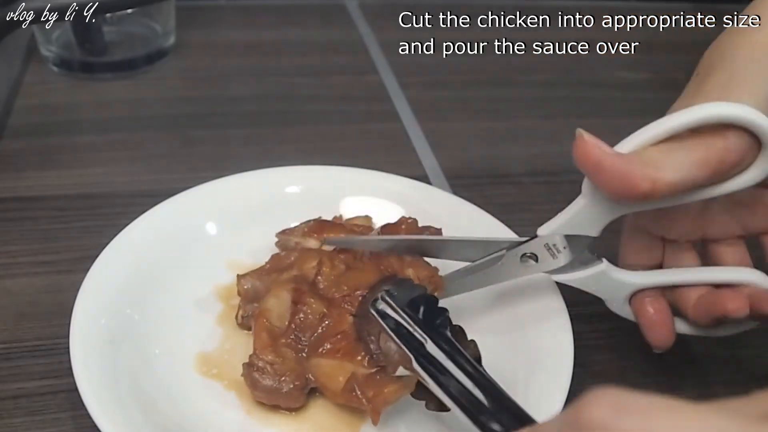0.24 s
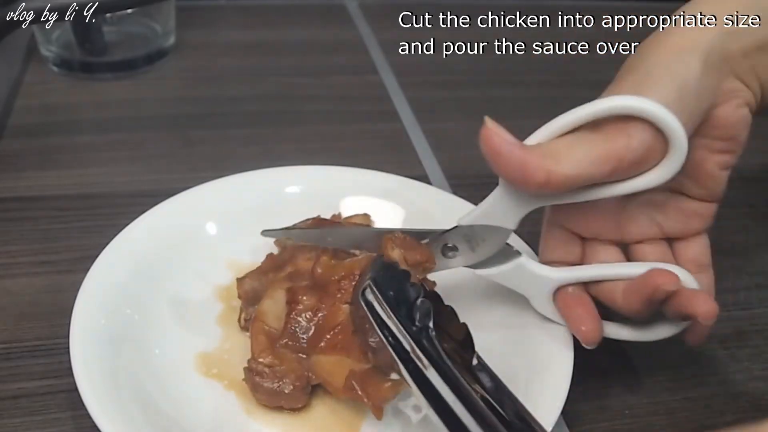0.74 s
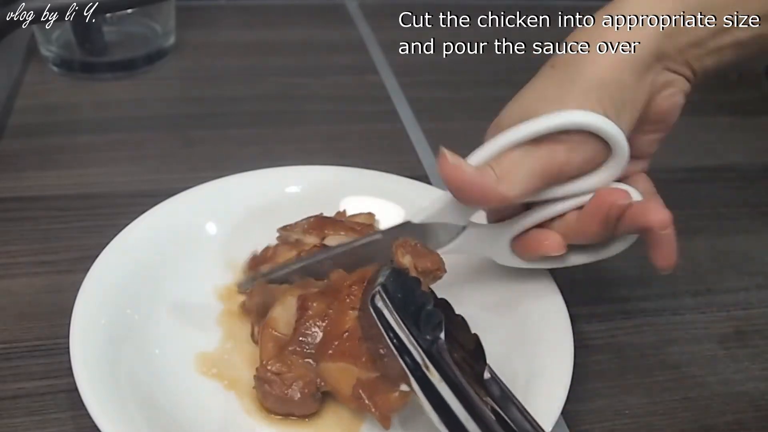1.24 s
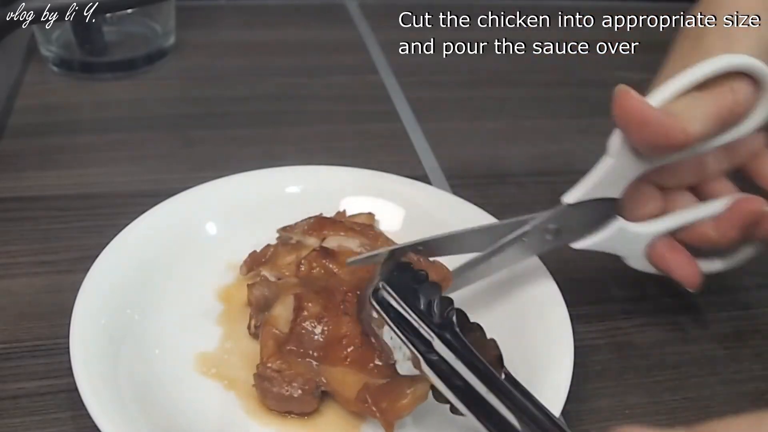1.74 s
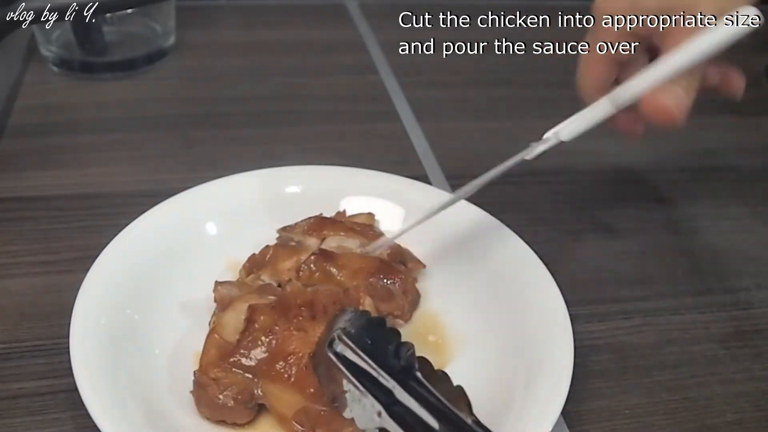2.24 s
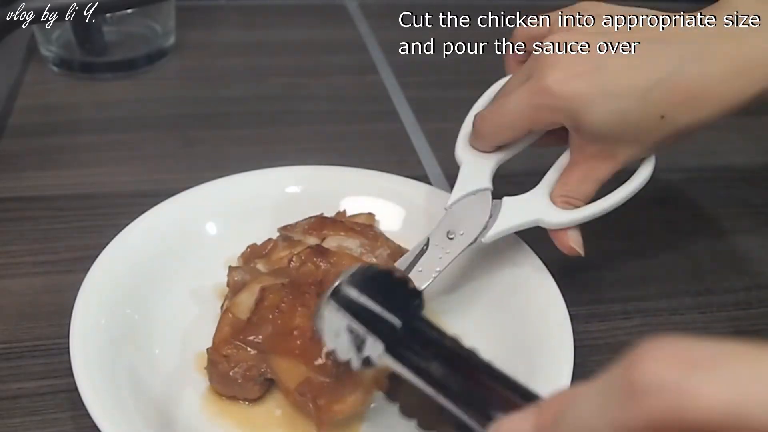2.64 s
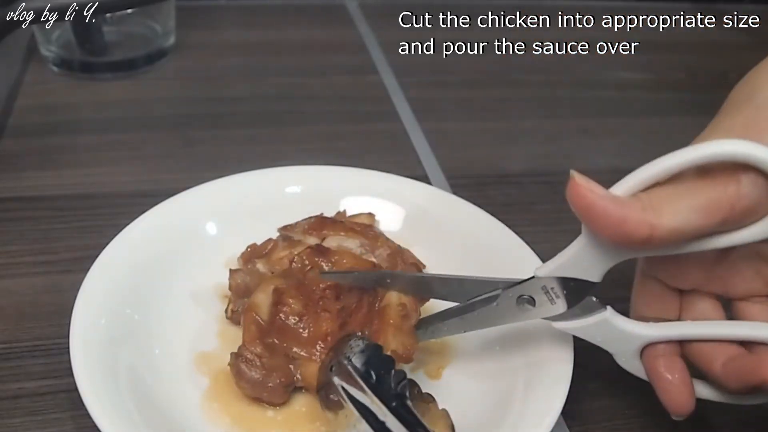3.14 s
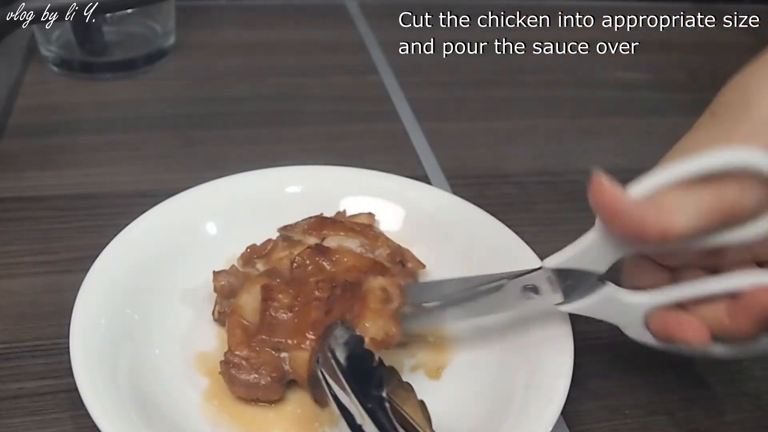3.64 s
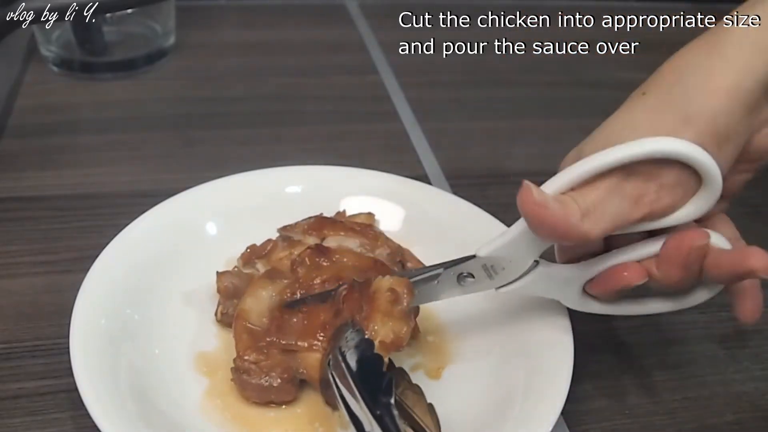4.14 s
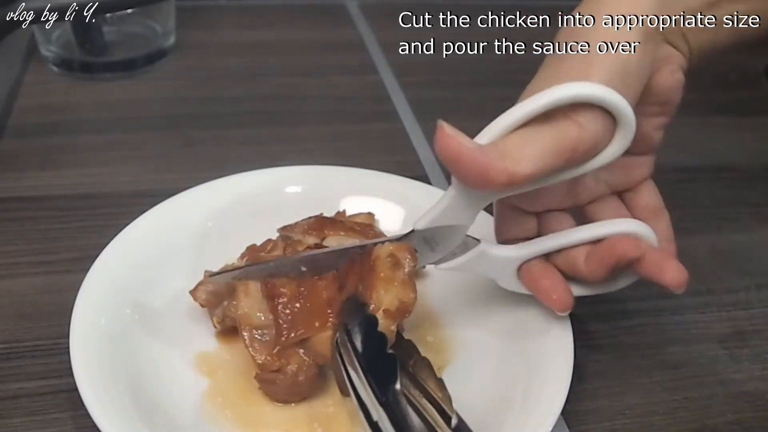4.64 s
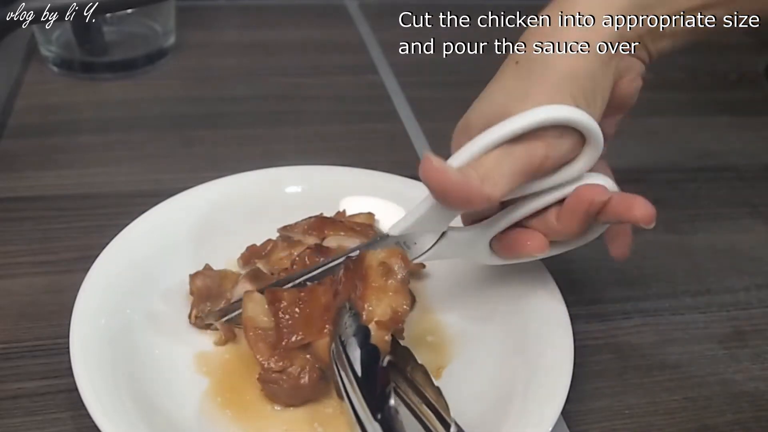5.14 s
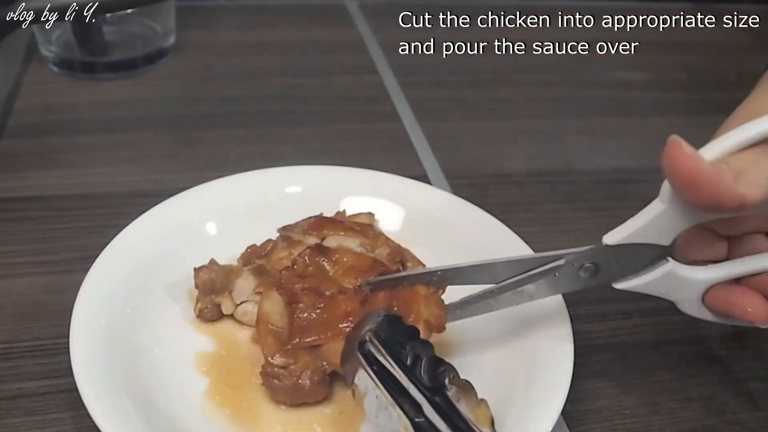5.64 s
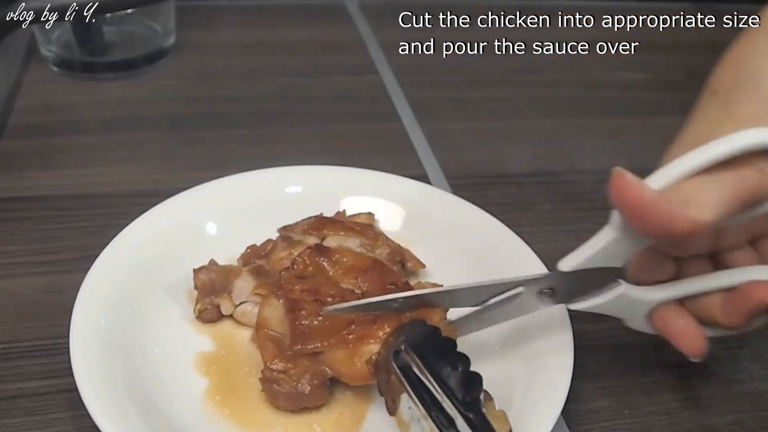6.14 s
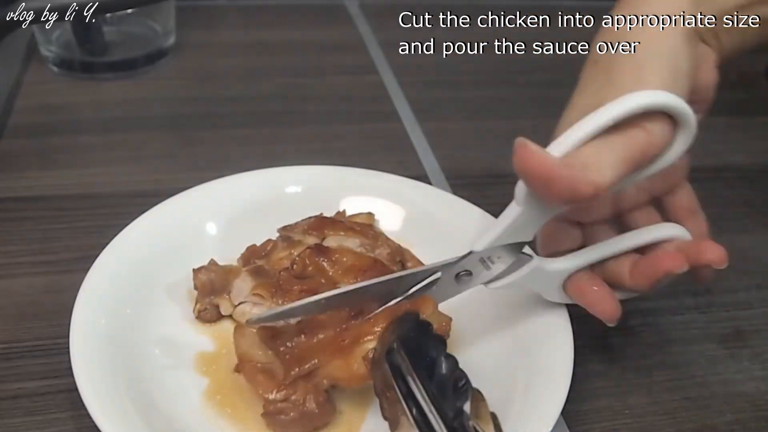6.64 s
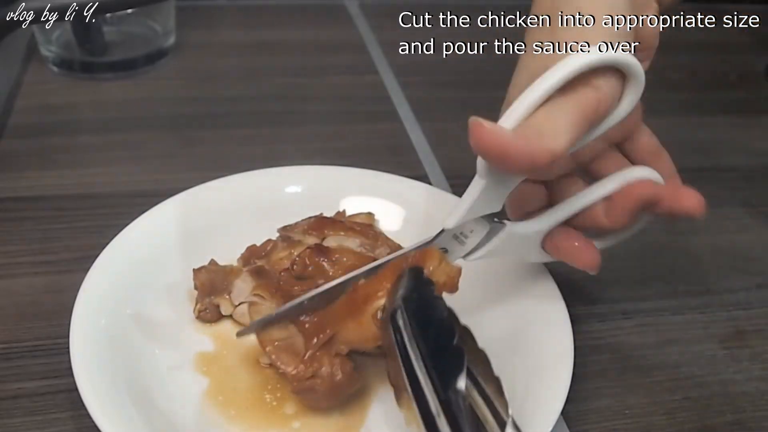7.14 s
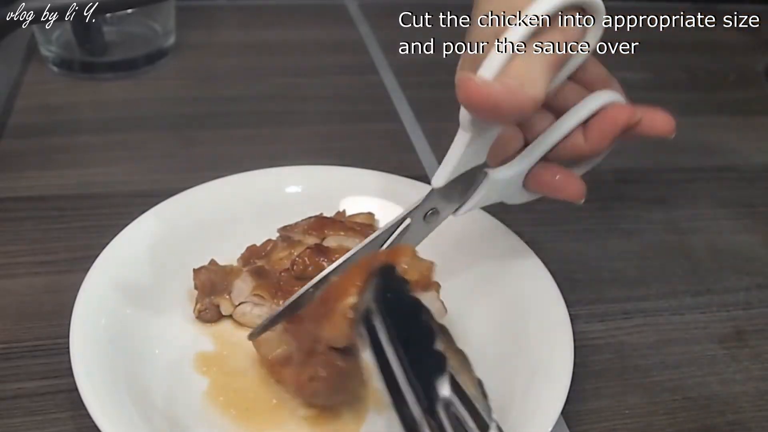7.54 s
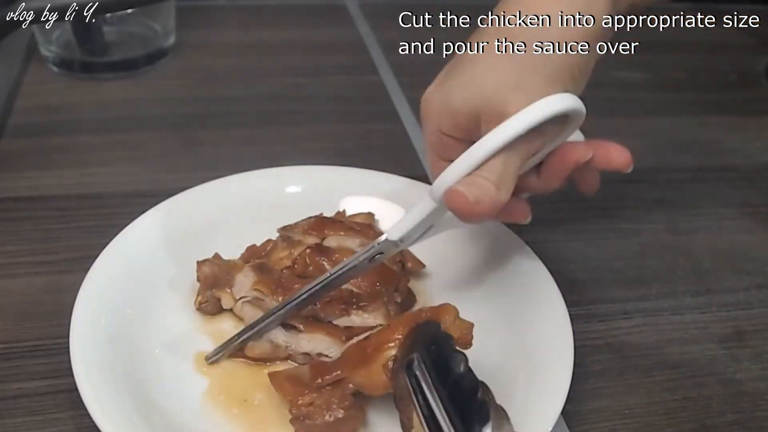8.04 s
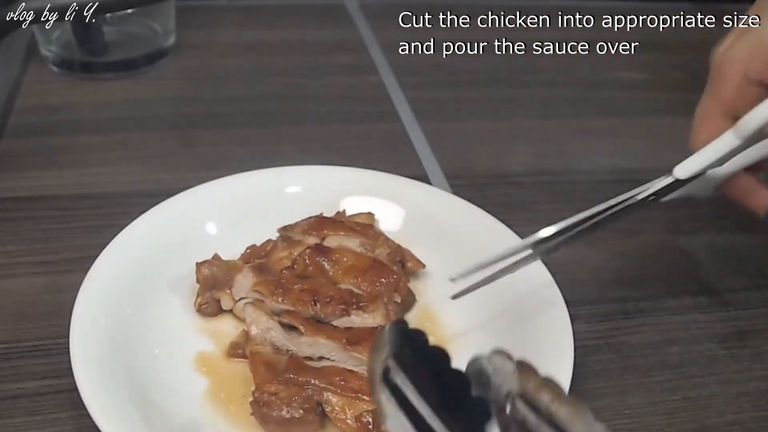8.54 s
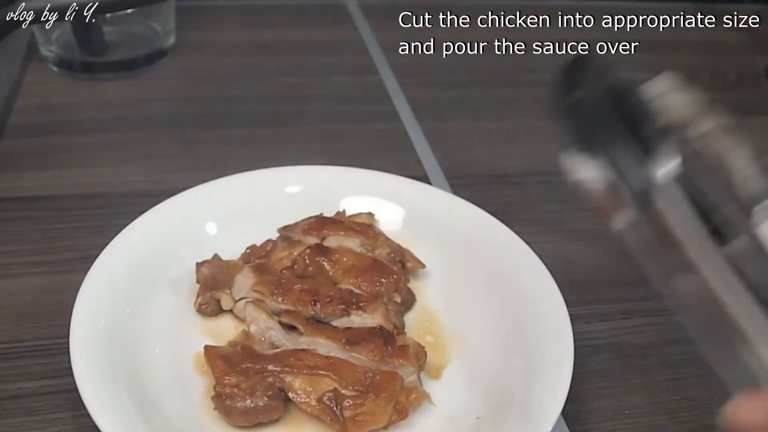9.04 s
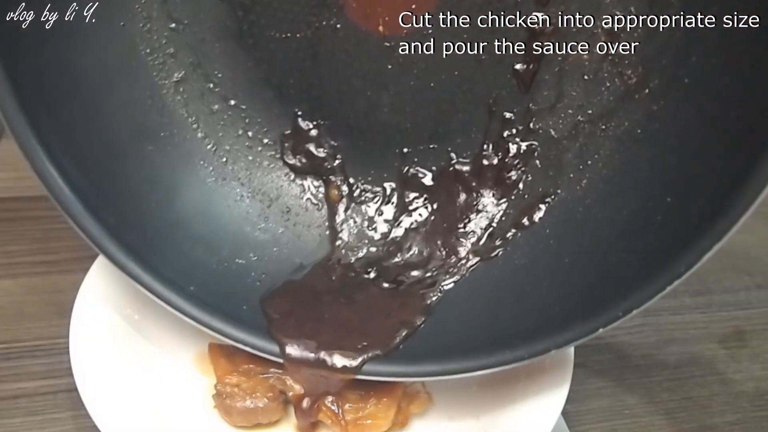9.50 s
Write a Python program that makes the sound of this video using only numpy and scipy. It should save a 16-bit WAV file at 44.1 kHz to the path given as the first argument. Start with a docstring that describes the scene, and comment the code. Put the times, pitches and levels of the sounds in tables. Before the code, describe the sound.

A low, wavering fan hum with soft airy hiss and a barely audible, very high whine runs for nearly ten seconds. A faint plate ring opens, then light ticks, soft scraping around 0.5 and modest clinks at 0.7 and 1.05. Rasping scrapes and ticks follow at 1.25. Strong, short clinks of steel on ceramic hit at 2.2 and 2.7, with a faint lingering ring between. A dull scrape and clink come at 3.3 to 3.4, a crisp snap at 3.9, a ringing clink at 5.0, a sharp tick at 5.5 and a smaller knock at 5.9. A hissy scrape at 6.55 precedes a loud rattling burst at 6.85, then a hard clink at 7.5. A soft scrape swells around 8.0, and a quick cluster of clinks lands at 8.4. After a tiny tick at 8.8 and a faint scrape at 9.0, mostly fan remains. Close microphone, hard-surfaced kitchen.

```python
"""Steel tongs and kitchen scissors clink, tick and scrape on a ceramic plate while meat is cut up.
Struck plate modes ring briefly, damped by the food; ticks are noise snaps with clusters of close partials.
Scrapes, and two faint lingering plate rings, are random grit driving plate modes, rumble, rasp and hiss.
Sparse taps make the hard kitchen ring on; a fan hums as noise and wavering tones, a thin high sine flickers.
The direct sound stands ahead of the room; the microphone has a treble notch, a shelf and a band limit."""
import sys
import numpy as np
from scipy import signal
from scipy.fft import rfft, irfft
from scipy.io import wavfile
from scipy.ndimage import uniform_filter1d

SR = 44100
rng = np.random.default_rng(int(sys.argv[2]) if len(sys.argv) > 2 else 0)


def digitize_waveform(pressure):
    """Quantize a signal to 16-bit integers and store it at the path in sys.argv[1].

    Rows of a 2-D input are taken as channels; values are limited to [-1, 1].
    """
    field = np.atleast_2d(pressure).T
    bounded = np.clip(field, -1, 1)
    quanta = np.round(bounded * 32767).astype(np.int16)
    wavfile.write(sys.argv[1], SR, quanta)


N = 430857  # samples

# Steel striking the plate; where it lands sets how much each family of modes rings, the food pulls their pitch.
# (time [s], blow level [dB], thud [Hz], rim [Hz], second [Hz], third [Hz], upper third [Hz],
#  then relative to the blow: table thud [dB], knock [dB], rim [dB], upper rim [dB], second [dB], third [dB],
#  upper third [dB], top modes [dB]; free ring [s], level change once the steel settles on the glaze [dB])
PLATE_BLOWS = [(0.718, -14, 720, 2390, 4130, 6390, 6750, -23, -21, -23, -35, -18, -9.5, -22, -32, 0.013, -25),
               (1.045, -16.5, 725, 2327, 4260, 6320, 6740, -24, -20, -19, -29, -21.5, -19.5, -30, -41, 0.014, -6),
               (2.166, -3, 720, 2323, 4190, 6380, 6790, -19.5, -12.5, -4, -31, -27, -6.5, -10.5, -24, 0.01, -15),
               (2.704, 0, 727, 2327, 4170, 6310, 6700, -16, -13.5, -11, -20, -30, -6, -20, -28, 0.004, -10.5),
               (3.293, -32.5, 718, 2370, 4130, 6240, 6850, -1, 2.5, -28, -27, -30, -24, -32, -32, 0.012, -5),
               (3.425, -17.5, 740, 2300, 4150, 6400, 6770, -17, -16, -23, -18.5, -35, -5, -17, -39, 0.015, -1.5),
               (4.971, -5.5, 718, 2325, 4090, 6420, 6700, -17, -13.5, 0.5, -36, -18, -11, -4, -26.5, 0.0096, -26),
               (5.93, -15.5, 720, 2344, 4040, 6480, 6750, -17, -9.5, -3, -9, -9.5, -8.5, -12, -23.5, 0.0051, -20),
               (6.845, 0, 717, 2253, 3990, 6370, 6650, -20.5, -20, -8, -13.5, -23, -9, -24, -24.5, 0.0061, -8),
               (6.851, -17, 715, 2380, 4120, 6270, 6680, -17, -31, -13, -27, -18, -8, -2, -32, 0.013, -7),
               (6.875, -6.5, 730, 2317, 4020, 6490, 6800, -20, -20, -4, -23, -15.5, -9, -16, -31, 0.012, -12),
               (7.477, -2.5, 730, 2334, 4120, 6330, 6780, -20.5, -16, -1, -24, -21.5, -6, -14, -24, 0.0074, -15.5),
               (7.541, -27, 697, 2370, 4150, 6380, 6720, 4.5, -23, -23, -16, -31, -19, -21, -38, 0.013, -7),
               (8.384, -11, 728, 2340, 4130, 6300, 6790, -20, -12, 0.5, -33, -22, -16, -15, -26, 0.012, -15),
               (8.407, -17, 728, 2400, 4100, 6220, 6790, -26, -10, -16, -26, -36, -18, -16, -26, 0.0096, 1),
               (8.437, -8, 728, 2385, 4110, 6280, 6800, -40, -13, -2, -16, -16.5, -16, -16, -48, 0.0072, -15)]
# Plate modes by family, the mode that sets the family's pitch first; ring times are stretched and levels
# rescaled in use. (untuned pitch [Hz], relative level [dB], unstretched t60 [s])
PLATE_MODES = [
    [(728.4, -5, 0.14), (488, -16, .07), (653, -6.5, 0.14)],
    [(1012, 0, .1), (851, -7, .1), (1087, -6, .08), (1281, -6, .1), (1810, -11, .07)],
    [(1525, 0, .25)],
    [(2361, 5.5, 0.12), (2005, -9, 0.11), (2150, -24, 0.1), (2278, -2, 0.09), (2363, -10, 0.19)],
    [(2506, -2, 0.23), (2654, -7, 0.087), (2876, -9, 0.078), (3410, -15, 0.082)],
    [(4130, 0, .15), (4050, -9, .12), (4200, -10, .12)],
    [(6416, 4.3, 0.04), (6146, -7, .07), (6270, -4.5, 0.068), (6384, -2, 0.08)],
    [(6730, 4, 0.19), (6650, 4.5, 0.24), (6830, 2, 0.12), (6870, -9, 0.099)],
    [(8760, 0, .12), (8080, -8, .06), (8694, -10, .09)],
    [(10990, 0, 0.13), (10400, -6, .08), (10850, -12, 0.15)],
]
RING_STRETCH, SCRAPE_STRETCH = 1.25, 0.34  # factors on the ring times, struck and scraped
# Spectrum of the crack of a blow: (frequency [Hz], relative level [dB])
CRACK_SPECTRUM = [(300, 14), (1100, 14), (1600, 7), (2500, 6.5), (6000, 2), (9000, -2), (13000, -27),
                  (17000, -23)]
CRACK_DB, BASE_DB, FIFTH_DB = -21, -32.5, -3  # crack and base ring against the blow, last family against the top

# Blades and tong tips touching, meat fibres snapping; ring levels before a common trim.
# (time [s], tick gain [dB], low ring [Hz], low ring level [dB], high ring [Hz], high ring level [dB])
TIP_TICKS = [(0.3476, -29, 4200, -19, 6900, -11), (0.6739, -33, 2500, -16, 8490, -9),
             (1.0071, -37, 3670, -18, 10100, -15), (1.028, -36, 4150, -9, 6390, -9),
             (1.2511, -22.5, 4170, -10, 6400, -5), (1.273, -20, 4300, -5, 6600, -7),
             (1.3094, -28, 4160, -13, 6250, -11), (1.655, -33, 2460, -12, 6100, -4),
             (1.726, -31, 2400, -14, 6360, -12), (1.77, -27.5, 4300, -25, 6430, -8),
             (1.819, -24, 2180, -5, 10300, -25), (1.9066, -28.5, 2530, -27, 6500, -10),
             (1.935, -35, 2460, -19, 6540, -8), (2.367, -32, 2400, -20, 6440, -7),
             (2.45, -32, 2900, -12, 6400, -11), (3.4253, -22, 2570, -18, 6430, -3),
             (3.678, -32, 2510, -23, 6360, -3), (3.5399, -36, 2520, -11, 4400, -11),
             (3.8945, -15.5, 3890, -8, 10000, -15), (0.8594, -45, 2420, -20, 6050, -8),
             (5.3487, -39, 2410, -16, 6480, -1), (5.4394, -34, 3980, -12, 6750, -9),
             (5.504, -15, 4430, -19, 7170, -4), (5.6285, -33, 2520, -15, 10300, -15),
             (5.82, -36, 2560, -18, 6650, -9), (5.857, -35, 4330, -17, 9140, -10),
             (6.02, -34, 2360, -12, 6750, -10), (6.055, -35, 2430, -22, 8380, -1),
             (6.106, -36, 2430, -24, 8600, 0), (6.4864, -28, 3350, -14, 6110, -17),
             (6.548, -24, 2400, -21, 9400, -1), (7.304, -33, 3010, -16, 6540, -10),
             (8.3394, -34, 4130, -13, 6230, -7), (8.773, -33, 2800, -17, 6410, -7)]
# Spectrum of the snap of a tick: (frequency [Hz], relative level [dB])
SNAP_SPECTRUM = [(1000, -32), (1800, -19), (4000, 6), (8000, -1.5), (12000, 0), (17000, -11)]
SNAP_DB, TICK_RING_TRIM_DB = -20, -17
TICK_T60_S, TICK_SPREAD = 0.029, 0.076  # ring length; largest rise of a partial as a share of its pitch

# Steel scrapes on the plate, and two faint lingering plate rings, at the start and near 2.25 s;
# each swells to a peak, holds and dies away.
# (peak time [s], swell [s], hold [s], dying [s], then levels at the peak: rumble [dB], base [dB], rim [dB],
#  upper rim [dB], second [dB], third [dB], rasp [dB], hiss [dB])
SCRAPES_AND_RINGS = [(0.005, 0.005, 0.022, 0.1, -48.5, -56.5, -53.5, -72, -69, -60, -60, -64),
                     (0.35, 0.19, 0.14, 0.03, -58, -68, -73, -76, -71, -65, -67, -66),
                     (0.5, 0.044, 0.03, 0.081, -56, -54, -66, -72, -59, -60, -68, -59),
                     (0.553, 0.046, 0.016, 0.04, -42.5, -54, -54, -64, -54, -58, -54, -52),
                     (0.735, 0.015, 0.018, 0.15, -45.5, -51.5, -56, -62, -66, -63, -60, -68),
                     (1.253, 0.056, 0.027, 0.04, -36.5, -54, -47, -59, -40, -41, -51, -46),
                     (1.286, 0.019, 0.013, 0.07, -34.5, -51, -36.5, -57, -39, -41, -41, -48),
                     (1.646, 0.01, 0.08, 0.11, -56, -70, -59, -72, -67, -60, -61, -63),
                     (2.253, 0.04, 0.27, 0.05, -58, -59.5, -52.5, -67, -75, -61.5, -75, -63),
                     (3.294, 0.15, 0.018, 0.16, -40, -53, -70, -60, -61, -64, -77, -72),
                     (3.422, 0.048, 0.02, 0.12, -37, -48, -61, -58, -51, -47, -55, -61),
                     (3.727, 0.015, 0.013, 0.04, -66, -68, -57, -71, -65, -58, -61, -58),
                     (3.899, 0.038, 0.0071, 0.028, -60, -72, -49.5, -55, -57, -47, -41, -48),
                     (4.017, 0.02, 0.039, 0.04, -62, -78, -73, -78, -72, -62, -68, -62),
                     (5.23, 0.063, 0.2, 0.05, -60, -67, -58, -68, -72, -65, -70, -70),
                     (6.548, 0.013, 0.011, 0.042, -60, -68, -48, -52, -67, -44, -50.5, -39),
                     (6.772, 0.013, 0.0082, 0.02, -66, -75, -57, -68, -57, -60, -55, -60),
                     (6.809, 0.012, 0.028, 0.01, -62, -66, -47, -48, -68, -51, -64, -55),
                     (8.002, 0.16, 0.073, 0.16, -50, -71, -52, -63, -67, -65, -70, -67),
                     (9.0, 0.03, 0.12, 0.03, -70, -74, -67, -71, -79, -77, -74, -78)]
# Spectra of the low rumble, the rasp and the hiss: (frequency [Hz], relative level [dB])
RUMBLE_SPECTRUM = [(120, -16), (250, -2), (700, 0.5), (1300, -4.5), (2000, -60), (4000, -45)]
RASP_SPECTRUM = [(900, -64), (1700, 10.5), (3000, -5), (4500, -4), (6500, -16)]
HISS_SPECTRUM = [(1000, -47), (2500, -1), (5000, -4), (8000, 6.5), (11000, 2), (14000, -8), (17000, -18)]
SCRAPE_RANGE_DB = 30  # how far the swell starts, and the dying ends, below the peak
CATCH_DB, CATCH_S = 4.5, 0.013  # the edge catches and lets go: rms depth and smoothing length of the clumps
GRAINS_PER_S = 1200

# How long the kitchen rings on: (frequency [Hz], t60 [s])
ROOM_DECAY = [(300, 0.27), (1000, 0.6), (2500, 0.47), (6500, 0.41), (12000, 0.29)]
ROOM_DB = -9.5  # kitchen tail against the direct sound

# Fan wash and hiss: (frequency [Hz], relative level [dB per Hz])
AIR_SPECTRUM = [(20, -23), (36, -0.5), (60, -10), (80, -7), (145, -5), (200, -10), (400, -14), (700, -16.5),
                (1100, -22.5), (2500, -29.5), (5300, -39.5), (7000, -37), (11000, -33.5), (16000, -32.5)]
AIR_DB = -44  # rms
# Wavering motor tones: (pitch [Hz], rms level [dB], waver bandwidth [Hz], waver depth [ratio])
MOTOR_TONES = [(36.2, -58.5, 11, .6), (98.7, -46.5, 28, 0.21), (281.8, -56, 17, 0.79),
               (569.6, -62, 2.9, 0.48)]
# Thin whine before its flicker: (time [s], rms level [dB])
WHINE_LEVEL = [(0, -57), (1.2, -57), (1.5, -57), (1.77, -65), (2.0, -54), (2.6, -59), (3.5, -54),
               (3.9, -61), (4.3, -67), (6.3, -68), (6.7, -61), (7.3, -69), (7.8, -63), (8.7, -62),
               (9.77, -54)]
WHINE_HZ, FLICKER_DB, FLICKER_SMOOTH_S = 15389, 1.5, 1 / 16  # pitch; rms flicker and its smoothing length

# Treble shelf of the microphone: (frequency [Hz], gain [dB])
MIC_SHELF = [(15600, 0.67), (15850, -40), (17000, -32)]
NOTCH_HZ, NOTCH_WIDTH_HZ, EDGE_HZ = 7900, 150, 16900  # notch centre, width of one pass; upper band limit


def clinks():
    """Each blow is a spit, a short crack and every family of plate modes, muffled when the steel comes to rest."""
    out, t = np.zeros(N), np.arange(SR // 3) / SR
    above_bass = signal.butter(2, 450, "high", fs=SR)
    for (s, blow_db, thud_hz, rim_hz, second_hz, third_hz, upper_hz,
         thud_db, knock_db, *middle_db, top_db, free_s, damping_db) in PLATE_BLOWS:
        crack = evened(coloured(rng.standard_normal(len(t)), CRACK_SPECTRUM))
        crack *= gain_of(CRACK_DB - 60 * t / 0.043)
        spit = rng.standard_normal(len(t)) * gain_of(CRACK_DB + 1 - 60 * t / 0.003)
        add(out, s, gain_of(blow_db) * signal.lfilter(*above_bass, crack + spit))
        # the level slides to its damped value within 9.3 ms
        muffle = gain_of(damping_db * np.clip((t - free_s) / 0.0093, 0, 1))
        family_db = thud_db, knock_db, BASE_DB, *middle_db, top_db, top_db + FIFTH_DB
        pitches_hz = thud_hz, 0, 0, rim_hz, 0, second_hz, third_hz, upper_hz, 0, 0  # 0 keeps the table pitch
        for modes, level_db, hz in zip(PLATE_MODES, family_db, pitches_hz):
            pull = hz / modes[0][0] if hz else 1
            phases = 0.12 * rng.random(len(modes))  # cycles
            ringing = ring(modes, RING_STRETCH, phases, pull)
            add(out, s, gain_of(blow_db + level_db) * muffle * ringing)
    return out


def ring(modes, stretch, phases, pull=1):
    """Decaying sines of one family of plate modes, scaled by their peak, with a 1.6 ms onset."""
    t = np.arange(SR // 3) / SR
    x = np.zeros(len(t))
    for (hz, db, t60), phase in zip(modes, phases):
        decay = gain_of(db - 60 * t / (t60 * stretch))
        x += decay * np.sin(2 * np.pi * (hz * pull * t + phase))
    onset = np.minimum(t / 0.0016, 1)
    return x * onset / abs(x).max()


def ticks():
    """A wide noise snap and two short clusters of close partials, each dying exponentially."""
    out, t = np.zeros(N), np.arange(8192) / SR
    for s, db, low_hz, low_db, high_hz, high_db in TIP_TICKS:
        snap = evened(coloured(rng.standard_normal(len(t)), SNAP_SPECTRUM))
        sound = snap * gain_of(SNAP_DB - 60 * t / 0.037)
        for hz, ring_db in ((low_hz, low_db), (high_hz, high_db)):
            partials_hz = hz * (1 + TICK_SPREAD * rng.uniform(-0.62, 1, (6, 1)))
            cluster = np.sin(2 * np.pi * partials_hz * t).sum(0)
            sound += cluster * gain_of(ring_db + TICK_RING_TRIM_DB - 60 * t / TICK_T60_S)
        add(out, s, gain_of(db) * sound)
    return out


def scrapes_and_rings():
    """Gritty impulses drive the plate modes, a low rumble, rasp and hiss, as scrapes or faint lingering rings."""
    out, click = np.zeros(N), signal.unit_impulse(512, 256)
    plate = [(ring(modes, SCRAPE_STRETCH, rng.random(len(modes))), 0) for modes in PLATE_MODES[2:7]]
    spectra = RUMBLE_SPECTRUM, RASP_SPECTRUM, HISS_SPECTRUM
    rumble, rasp, hiss = ((coloured(click, spectrum), 256) for spectrum in spectra)
    bodies = rumble, *plate, rasp, hiss  # each with the samples ahead of its centre
    grit, t = slips(), np.arange(N) / SR
    drives = np.zeros((len(bodies), N))
    for peak, swell, hold, dying, *levels_db in SCRAPES_AND_RINGS:
        # 0 during the hold, 1 where the swell starts and the dying ends
        away = np.maximum((peak - t) / swell, (t - peak - hold) / dying).clip(0)
        on = away < 1
        drives[:, on] += gain_of(np.array(levels_db)[:, None] - SCRAPE_RANGE_DB * away[on])
    for drive, (body, lead) in zip(drives, bodies):
        out += signal.oaconvolve(drive * grit, body / np.linalg.norm(body))[lead:lead + N]
    return out


def slips():
    """Random impulses of either sign and uneven size, in clumps as the edge catches and lets go."""
    sizes = gain_of(1.8 * np.minimum(rng.exponential(1, N), 3))
    catching = evened(uniform_filter1d(rng.standard_normal(N), round(CATCH_S * SR)))
    clumps = gain_of(CATCH_DB * catching)
    struck = rng.random(N) < GRAINS_PER_S / SR
    return evened(sizes * clumps * struck * rng.choice([-1., 1.], N))


def kitchen(x):
    """The hard room answers with sparse taps of random sign, each band dying at its own speed."""
    taps = np.zeros(SR)
    at = np.arange(300, SR - 20, 20)  # one tap in every 20 samples
    taps[at + rng.integers(0, 20, len(at))] = rng.choice([-1., 1.], len(at))
    hz, t, bands = signal.stft(taps, SR, nperseg=256)
    decay = gain_of(-60 * t / read(ROOM_DECAY, hz)[:, None])
    tail = signal.istft(bands * decay, SR, nperseg=256)[1]
    return signal.fftconvolve(x, tail / np.linalg.norm(tail))[:N]


def fan():
    """Shaped noise is the wash, slow complex noise wavers the motor tones, a flickering sine is the whine."""
    t = np.arange(N) / SR
    out = gain_of(AIR_DB) * evened(coloured(rng.standard_normal(N), AIR_SPECTRUM))
    for hz, db, waver_hz, depth in MOTOR_TONES:
        pole = np.exp(-np.pi * waver_hz / SR)
        a, b = signal.lfilter([1], [1, -pole], rng.standard_normal((2, N)))
        wobble = 1 + depth * (evened(a) + 1j * evened(b))
        out += gain_of(db) * evened((wobble * np.exp(2j * np.pi * hz * t)).real)
    width = round(FLICKER_SMOOTH_S * SR)
    flicker = evened(uniform_filter1d(uniform_filter1d(rng.standard_normal(N), width), width))
    whine = np.sqrt(2) * np.sin(2 * np.pi * WHINE_HZ * t)
    return out + curve(WHINE_LEVEL) * gain_of(FLICKER_DB * flicker) * whine


def gain_of(db):
    """Decibels to amplitude."""
    return 10 ** (np.asarray(db) / 20)


def evened(x):
    """Scales to rms 1."""
    return x / np.sqrt(np.mean(x ** 2) + 1e-20)


def read(points, hz):
    """Reads a spectrum on a log-frequency axis."""
    f, value = np.transpose(points)
    return np.interp(np.log(hz + 1), np.log(f + 1), value)


def curve(rows):
    """Reads a level curve as a gain for every sample."""
    return gain_of(np.interp(np.arange(N) / SR, *np.transpose(rows)))


def add(mix, s, sound):
    """Adds a sound at a time in seconds."""
    part = mix[round(s * SR):][:len(sound)]
    part += sound[:len(part)]


def coloured(x, points):
    """Shapes a sound by a spectrum."""
    hz = np.fft.rfftfreq(len(x), 1 / SR)
    return irfft(rfft(x) * gain_of(read(points, hz)), len(x))


def scene():
    """The plate in front, the kitchen's answer behind it, the fan in the background."""
    plate = clinks() + ticks() + scrapes_and_rings()
    return (plate + gain_of(ROOM_DB) * kitchen(plate) + fan())[None]


def record(dry):
    """The microphone passes a narrow notch twice, then a treble shelf and the band limit."""
    notch = signal.iirnotch(NOTCH_HZ, NOTCH_HZ / NOTCH_WIDTH_HZ, SR)
    notched = signal.lfilter(*notch, signal.lfilter(*notch, dry[0]))
    band_limit = signal.firwin(511, EDGE_HZ, window=("kaiser", 9), fs=SR)
    return signal.oaconvolve(coloured(notched, MIC_SHELF), band_limit, "same")[None]


dry = scene()
out = record(dry)
digitize_waveform(out)
```